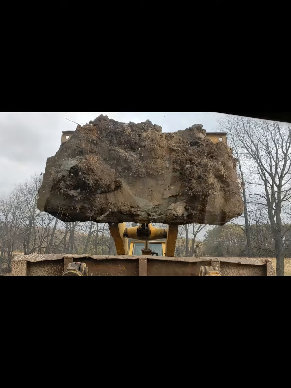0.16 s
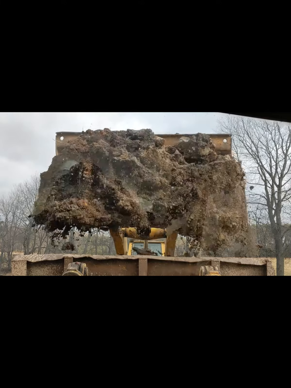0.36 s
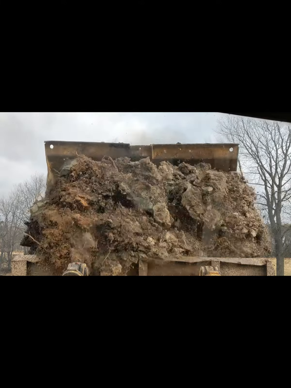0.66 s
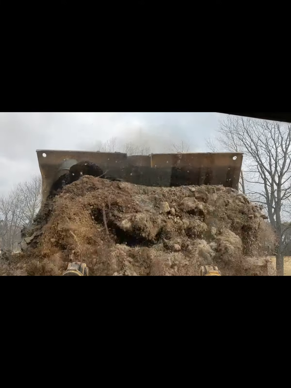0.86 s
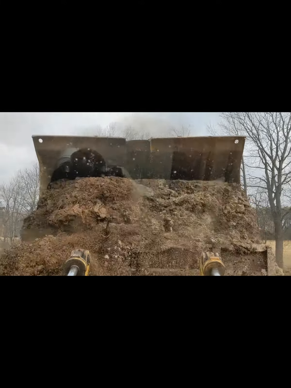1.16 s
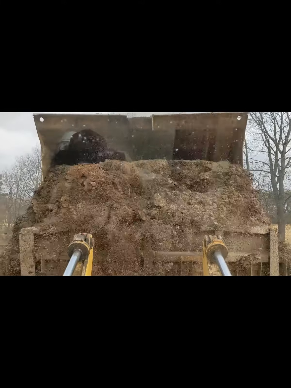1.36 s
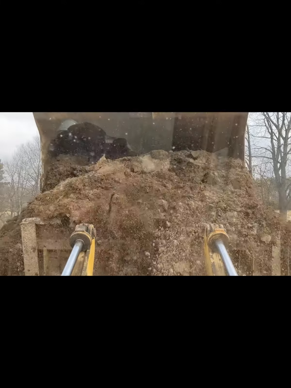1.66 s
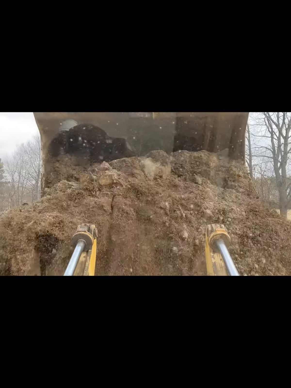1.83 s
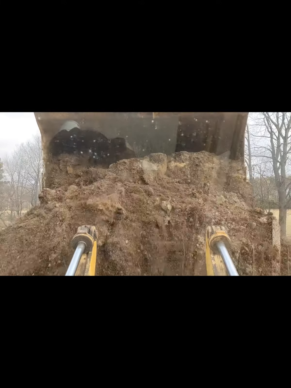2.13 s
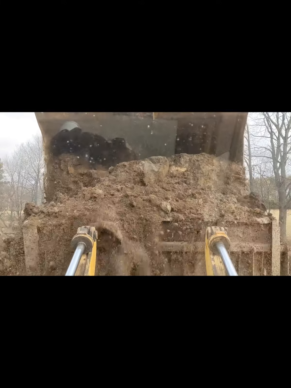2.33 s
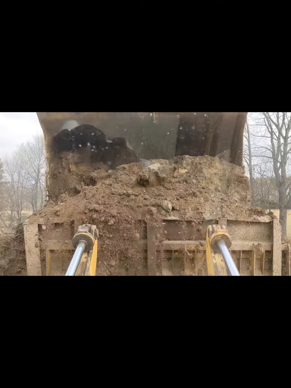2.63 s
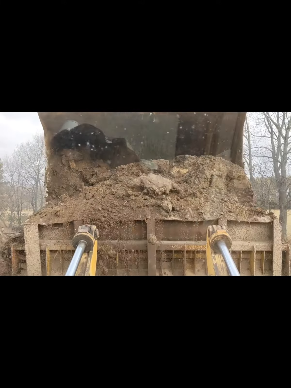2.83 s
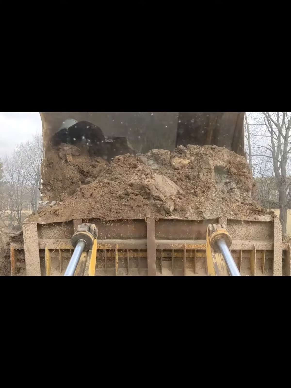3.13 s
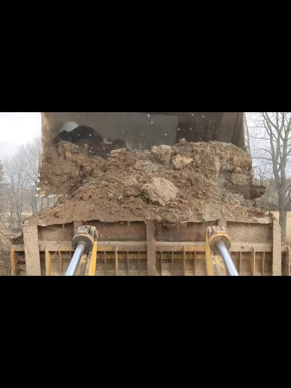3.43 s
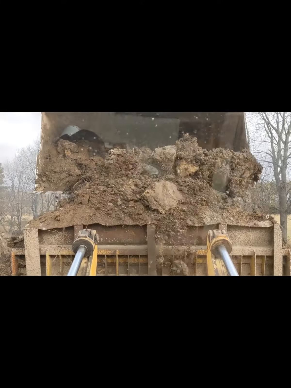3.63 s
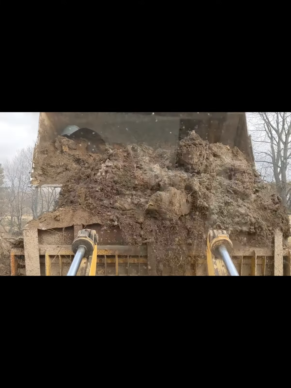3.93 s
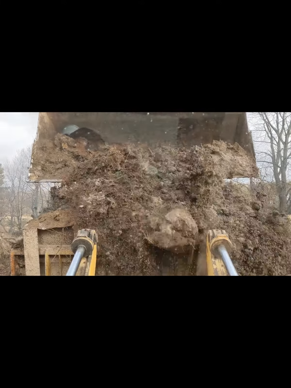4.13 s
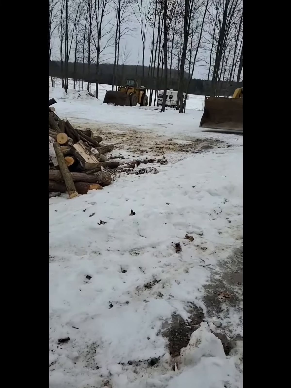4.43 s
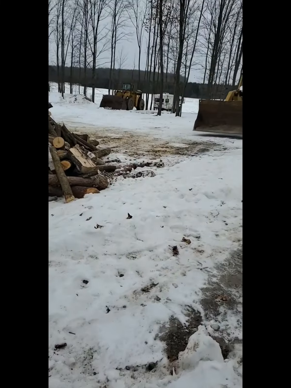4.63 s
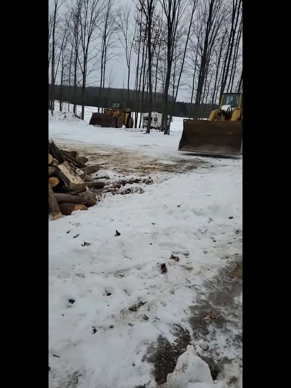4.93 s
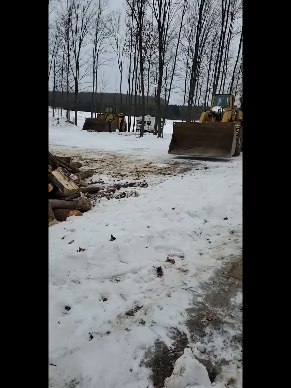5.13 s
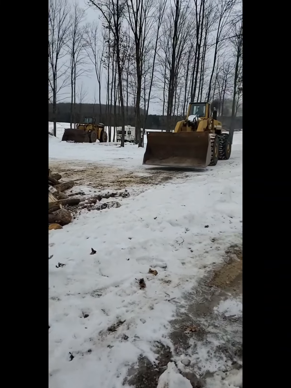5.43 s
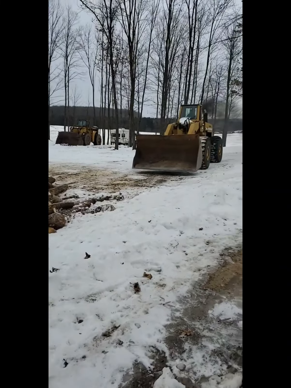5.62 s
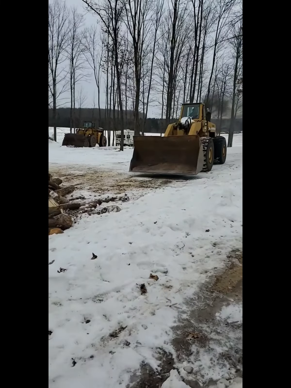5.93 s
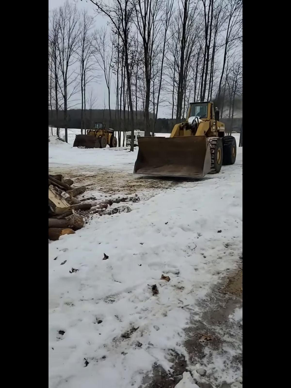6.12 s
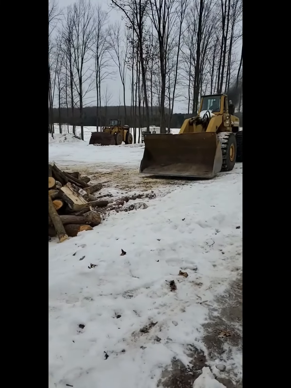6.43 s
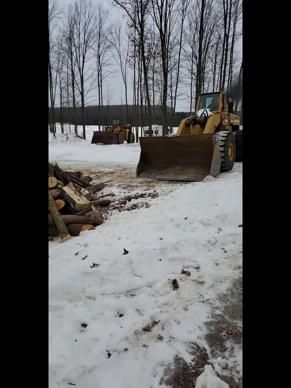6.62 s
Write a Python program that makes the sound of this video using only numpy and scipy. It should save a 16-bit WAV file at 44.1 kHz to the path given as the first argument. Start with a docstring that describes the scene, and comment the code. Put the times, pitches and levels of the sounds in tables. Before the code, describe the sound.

Close inside a loader cab, in stereo, a big diesel runs steadily with a boomy roar and buzzing panels. Soil and clods pour from a steel bucket into a truck, scraping and thudding; a low shudder swells, and a loose fitting clanks. It cuts dead. After a brief gap, a second loader, outdoors and mono, revs up with fan whine and throbbing hiss, then eases until its bucket clanks on frozen ground and booms.

```python
"""A diesel wheel loader heard from its cab: periodic firings excite the frame, cabin and panels, while
filtered noise grains make soil slide from the bucket into a truck; fittings rattle and one clanks.
The sound cuts off. After a short silence a second loader drives up over snow: its firing tone and fan
whine rise together, then ease a little, with a pulsing noise hiss, until its bucket strikes the ground
in a clank of damped partials."""
import sys
import numpy as np
from scipy.fft import rfft, irfft, next_fast_len
from scipy.io import wavfile
from scipy.ndimage import uniform_filter1d, minimum_filter1d, map_coordinates

SR = 44100
rng = np.random.default_rng(int(sys.argv[2]) if len(sys.argv) > 2 else 0)


def wrap_up_sound(samples):
    """Save the sound to the file named by the first command line argument, as 16-bit audio."""
    columns = np.atleast_2d(samples).T
    # keep every value between -1 and 1, then stretch to whole-number steps
    tamed = np.clip(columns, -1, 1)
    steps = np.round(tamed * 32767).astype(np.int16)
    wavfile.write(sys.argv[1], SR, steps)


N = 298557
TIME = np.arange(N) / SR  # seconds
CAB_END, YARD_START = 4.236, 4.494  # seconds
FLUTTER = 0.18  # phase flutter of the yard loader's tones, radians

# reference level of the engine's roar in the cab, which rattle, soil and lumps follow: start_s, level_db
ROAR_LEVEL = [(0, -18), (.85, -18), (.97, -20.5), (1.1, -17), (1.55, -18), (1.7, -22), (1.98, -16),
              (2.15, -19.5), (2.4, -17), (2.85, -20.5), (3.15, -24.5), (3.36, -22.5), (3.47, -20),
              (3.7, -19), (4.23, -20)]


def cab_engine():
    """Periodic forcing: the firings drive the frame, the air of the cabin and its panels."""
    cycles = turns(14.47 / 2 * (1 + 0.002 * wobble(6)))  # engine cycles, nearly constant speed
    return frame_hum(cycles) + cabin_resonances() + shudder() + cabin_boom() + roar_and_rattle(cycles)


def frame_hum(cycles):
    """Fourier's principle: the repeating engine cycle radiates tones at multiples of its rate."""
    # partials of the engine cycle: multiple, level_db
    orders = [(8, -19), (9, -36), (10, -27.5), (12, -26), (14, -33.5), (20, -35.5)]
    return sum(amp(db + 0.53 * wobble(6.28)) * tone(k * cycles, 0.13 * wobble(13)) for k, db in orders)


def cabin_resonances():
    """Resonance: the cabin answers at its own note, and a panel hums along as the last soil leaves."""
    drone_hz, drone_db, panel_hz = 110.2, -25.5, 337
    # swells of the cabin's own note: start_s (of the peak), level_db, length_s
    drone_swells = [(.3, -36, 0.15), (1.378, -17.5, 0.028), (1.646, -9, 0.055), (2.104, -18, .12),
                    (3.324, -23.5, 0.068), (4.154, -21.5, 0.065)]
    # hums of the panel: start_s (of the peak), level_db, length_s
    panel_hums = [(3.3, -35.5, 0.44), (3.502, -27, 0.085), (3.944, -24, 0.11)]
    strength = amp(drone_db + 3.8 * wobble(15)) + swells(drone_swells)
    drone = strength * tone(drone_hz * TIME, 0.5 * wobble(18))
    panel = swells(panel_hums) * tone(panel_hz * TIME, 0.33 * wobble(25))
    return drone + panel


def shudder():
    """Growth and decay: a low cabin tone builds exponentially as the bucket empties, then stops quickly."""
    peak_s, peak_db = 3.09, -7.5
    # pitch of the shudder: start_s, pitch_hz
    pitch = [(2.5, 46.3), (2.8, 50.5), (3.1, 52.9), (3.3, 50.2)]
    strength = amp(peak_db + ramp(peak_s, rise=17.5, fall=47.5))
    return strength * tone(turns(curves(pitch)[0]), 0)


def cabin_boom():
    """Coloured noise: low-frequency noise shaped by the cabin, with its own swells evened out."""
    # boom spectrum: pitch_hz, level_db (per Hz)
    spectrum = [(22, -33.5), (33, -22), (45, -13), (57, 1.5), (68, 4.5), (82, -11), (98, -5), (135, -16.5),
                (190, -29), (300, -69)]
    # boom level: start_s, level_db
    level = [(0, -20), (.65, -20), (1.2, -16.5), (1.6, -14), (1.9, -14.5), (2.4, -14), (2.8, -14.5),
             (3.25, -22), (3.7, -17.5), (4.2, -19.5)]
    return amp(curves(level)[0]) * steady(rush(1, spectrum), span=0.055)


def roar_and_rattle(cycles):
    """Amplitude modulation: firing pulses and uneven chatter gate part-periodic noise in two bands."""
    # roar spectrum: pitch_hz, level_db (per Hz)
    roar_spectrum = [(90, -18), (150, 4.5), (200, -3.5), (260, 1), (370, -3.5), (560, -9.5), (800, -8.5),
                     (1100, -16.5), (1700, -46), (3000, -67)]
    # rattle spectrum: pitch_hz, level_db (per Hz)
    rattle_spectrum = [(500, -23), (900, -4), (1200, -0.5), (1800, -1), (2300, -1), (2650, -9),
                       (2950, -13.5), (3600, -26.5), (6000, -66.5)]
    rattle_db, roar_trim_db = -7.5, -1.04  # relative to the roar's reference level
    # loose panels chatter at an uneven rate on top of the eight firing pulses a cycle
    chatter = bursts(turns(42 * amp(3.6 * wobble(35))), sharpness=0.2, scatter_db=1.0)
    shake = chatter * bursts(8 * cycles, sharpness=0.068, scatter_db=0.3)
    roar = in_cab(shake, roar_spectrum, combustion(cycles, share=0.45, size=6000))
    rough_shake = shake * amp(0.61 * wobble(500))
    rattle = in_cab(rough_shake, rattle_spectrum, combustion(cycles, share=0.27, size=6000))
    mixed = amp(roar_trim_db) * steady(roar, span=0.2) + amp(rattle_db) * steady(rattle, span=0.43)
    return amp(curves(ROAR_LEVEL)[0]) * mixed


def low_swells():
    """Beating-like swells: short low tones swell at 57 to 80 Hz, each at its own time and pitch."""
    # low tones: start_s (of the peak), pitch_hz, level_db, length_s
    low_tones = [(0.79, 80, -7.5, 0.023), (0.89, 75, -11.5, 0.03), (1.15, 70, -10, 0.047),
                 (1.305, 56.83, -7.5, 0.051), (1.413, 66.1, -8.5, 0.025), (1.746, 63.6, -12.5, 0.053),
                 (1.874, 59.9, -10.5, 0.072), (2.11, 64.9, -13, 0.076), (2.41, 57.9, -12, 0.082),
                 (2.695, 56.52, -13.5, 0.14), (3.38, 63.2, -8, 0.033), (4.1, 58.06, -13.5, 0.087)]
    return sum(amp(db) * swell(s, length) * tone(hz * TIME + rng.random(), 0)
               for s, hz, db, length in low_tones)


def soil():
    """Granular flow: fine grains merge into noise, while clods and lumps give separate impacts."""
    drumming = amp(curves(ROAR_LEVEL)[0] - 9) * lumps()  # 9 dB below the roar's reference level
    return pour() + scraping() + thudding() + drumming


def pour():
    """Granular noise: crumbs pour in dense uneven bursts, with small stones ticking and fine dust above."""
    # soil spectrum: pitch_hz, level_db (per Hz)
    soil_spectrum = [(2000, -32), (3100, 1.5), (4200, 0.5), (5200, -2.5), (6700, 0.5), (8300, -4),
                     (10500, -11.5), (16000, -34.5)]
    # dust spectrum: pitch_hz, level_db (per Hz)
    dust_spectrum = [(6000, -26.5), (9500, -4.5), (12000, -4.5), (15700, -6.5)]
    # dust level: start_s, level_db
    dust_level = [(.45, -70), (.65, -57.5), (1.05, -52.5), (1.25, -54.5), (1.7, -53.5), (2, -53.5),
                  (2.5, -48.5), (2.8, -62), (3.35, -67.5), (4.23, -54.5)]
    soil_db, dust_share = -23, 0.17  # relative to the roar; share of the dust's rise and fall it takes on
    stone_db = -23.5  # relative to the soil
    dust_db, = curves(dust_level)
    soil_gain = amp(curves(ROAR_LEVEL)[0] + soil_db + dust_share * (dust_db - dust_db.mean()))
    uneven = amp(0.33 * wobble(900) + 1.9 * wobble(6.9))
    grains = uneven * bursts(turns(55 * amp(4 * wobble(45))), sharpness=0.15, scatter_db=1.54)
    ticks = in_cab(stones(per_s=40, scatter_db=0), soil_spectrum)
    sliding = soil_gain * (in_cab(grains, soil_spectrum) + amp(stone_db) * ticks)
    return sliding + amp(dust_db) * in_cab(grains, dust_spectrum)


def scraping():
    """Friction as a train of small impacts: stones catch on the steel as clods scrape down the bucket."""
    # scrapes: start_s (of the peak), level_db, length_s
    scrapes = [(0.644, -27, 0.022), (0.748, -31.5, 0.042), (0.905, -28.5, 0.036), (2.196, -29, 0.019)]
    # scrape spectrum: pitch_hz, level_db (per Hz)
    spectrum = [(1400, -17), (2100, 12), (2600, 5.5), (3500, -0.5), (5000, -6.5), (8000, -13), (15000, -31)]
    return swells(scrapes) * in_cab(1, spectrum, grit())


def grit():
    """Impulsive noise: a fine crackle of stones on steel, as a pair of unrelated streams."""
    return np.array([stones(per_s=700, scatter_db=1.5) for _ in range(2)])


def stones(per_s, scatter_db):
    """Poisson impulses: random ticks whose sizes scatter by scatter_db, scaled to rms 1."""
    return unit((rng.random(N) < per_s / SR) * amp(scatter_db * rng.standard_normal(N)))


def thudding():
    """Impact excitation: clods land softly on the truck bed and its struck plate rings on at one pitch."""
    # landings: start_s, thud_db, thud_t60_s, plate_pitch_hz, plate_db
    landings = [(1.946, -19.5, 0.14, 1107, -24.5), (1.961, -30, .15, 480, -17),
                (2.275, -21, 0.068, 350, -21.5), (2.4, -32, 0.091, 484, -21.5), (2.555, -34, .1, 1049, -31),
                (2.85, -21.5, 0.12, 1097, -33), (3.898, -17.5, 0.061, 380, -30)]
    # thud spectrum: pitch_hz, level_db (per Hz)
    spectrum = [(120, -10), (170, -5), (300, -16.5), (480, 0.5), (700, -2.5), (950, -12.5), (1170, 10),
                (1400, -17), (2600, -25.5), (3500, -43.5)]
    plate_t60_s = 0.42
    thuds = sum(amp(db) * struck(s, t60) for s, db, t60, _, _ in landings)
    plates = sum(amp(db) * struck(s, plate_t60_s) * tone(hz * TIME, 0.32 * wobble(70))
                 for s, _, _, hz, db in landings)
    return thuds * in_cab(1, spectrum) + plates


def lumps():
    """Local modes: each small lump briefly rings a patch of steel at a pitch of its own; rms 1."""
    per_s, scatter_db = 280, 2.5
    centre_hz, spread_octaves, tilt_db_per_octave, t60_s = 562.5, 0.65, -2.5, 0.17
    count = int(per_s * CAB_END)
    start, phase_left, phase_right = rng.random((count, 3)).T[..., None]
    pitch, size = rng.standard_normal((count, 2)).T[..., None]
    octaves = spread_octaves * np.clip(pitch, -1.4, 2.4)
    age = np.arange(SR // 14) / SR
    fade = amp(-60 * age / t60_s) * np.clip(age / 0.0022, 0, 1)
    strength = amp(scatter_db * size + tilt_db_per_octave * octaves) * fade
    at = ((start * CAB_END * SR).astype(int) + np.arange(len(age))).ravel()
    cycles = centre_hz * 2 ** octaves * age + phase_left
    # the right channel differs only in phase
    lags = (0, 3 * (phase_right - 0.5))
    return unit(np.array([np.bincount(at, (strength * tone(cycles, lag)).ravel(), N) for lag in lags]))


def knocks():
    """Modal impact: each blow cracks and sets a loose steel fitting ringing in damped modes and buzzing."""
    # hard knocks: start_s, ring_db, crack_db, t60_s (of the buzz and crack)
    blows = [(0.599, -41, -19.5, 0.066), (3.226, -21.5, -44.5, 0.094), (3.232, -19, -44, 0.14),
             (3.254, -32.5, -54.5, 0.08)]
    # modes of the fitting: pitch_hz, level_db, t60_s
    steel_modes = [(1307, -3, 0.25), (1650, -6, .27), (1750, -9, 0.24), (1965, 2, .17), (2131, 0, 0.13),
                   (2390, -2, .15), (2450, -11, 0.11), (2940, -5, 0.12), (3203, 2, 0.08), (3330, -5.5, .08),
                   (3730, -14, .1), (4210, -10, 0.11), (5200, -12, 0.088)]
    # buzz spectrum: pitch_hz, level_db (per Hz)
    buzz_spectrum = [(700, -11), (1300, -5.5), (2000, 2), (2750, -9), (3150, -3.5), (3600, -15.5),
                     (5000, -18), (6000, -22), (15000, -51.5)]
    # crack spectrum: pitch_hz, level_db (per Hz)
    crack_spectrum = [(1500, -4.5), (3500, 0), (7000, -3), (11000, -11), (15500, -20.5)]
    steel_db, buzz_db = -3.5, 2.5  # clean ring and buzz, relative to ring_db
    ring, buzz, crack = np.zeros((2, N)), np.zeros(N), np.zeros(N)
    t = np.arange(SR // 2) / SR
    for s, ring_db, crack_db, t60 in blows:
        age = np.maximum(TIME - s, 0)
        fade = (1 - np.exp(-age / 0.0018)) * amp(-60 * age / t60)
        buzz += amp(ring_db + buzz_db) * fade
        crack += amp(crack_db) * fade
        modes = np.zeros((2, len(t)))
        for hz, db, life in steel_modes:
            phase = rng.random() + 0.3 * rng.random((2, 1))  # slightly apart in the two channels
            modes += amp(db - 60 * t / life) * np.sin(2 * np.pi * (hz * t + phase))
        onset = 1 - np.exp(-t / 0.00071)
        ring[:, round(s * SR):][:, :len(t)] += amp(ring_db + steel_db) * modes * onset
    buzzing = buzz * in_cab(amp(0.58 * wobble(430)), buzz_spectrum)
    cracking = crack * in_cab(amp(1.4 * wobble(720)), crack_spectrum)
    return ring + buzzing + cracking


def yard_loader():
    """Harmonic locking: firing tone, growl and fan of a six-cylinder diesel all follow one engine speed."""
    # engine speed: start_s, firings_per_s
    speed = [(4.5, 98.3), (4.87, 99.7), (5.2, 102.9), (5.45, 106.1), (5.75, 108.8), (6.15, 110.1),
             (6.77, 108.4)]
    # effort of the engine: start_s, rumble_db, exhaust_db
    effort = [(4.5, -32.5, -28), (4.62, -32, -24.5), (4.78, -24, -23.5), (5, -19.5, -24.5),
              (5.3, -22.5, -26.5), (5.55, -21.5, -26.5), (6, -17.5, -24.5), (6.33, -20.5, -25.5),
              (6.55, -20, -25)]
    # rumble spectrum: pitch_hz, level_db (per Hz)
    rumble_spectrum = [(22, -24), (36, -10), (52, 4.5), (65, -2.5), (82, 4), (120, -2.5), (160, -3),
                       (210, -8), (300, -17.5), (500, -68.5)]
    rumble_db, exhaust_db = curves(effort)
    firing = turns(curves(speed)[0] * (1 + 0.002 * wobble(20)))
    pulses = bursts(firing, sharpness=2.3, scatter_db=2.0)
    rumble = amp(rumble_db) * steady(rush(pulses, rumble_spectrum), span=0.12)
    whine = fan(2.32 * firing)  # belt-driven, 2.32 blades pass per firing
    broadband = treble_dips(exhaust(firing, exhaust_db) + loose_treble(firing))
    return firing_hum(firing) + rumble + whine + growl(firing) + broadband


def firing_hum(firing):
    """Periodic source: the firing tone and its half-rate companion swell together."""
    # swells: start_s (of the peak), level_db, length_s
    hum_swells = [(4.805, -18.5, 0.058), (5, -23, 0.034), (5.398, -24, 0.057), (6.26, -23.5, 0.27)]
    strength = amp(-28.5 + 1.8 * wobble(19)) + swells(hum_swells)
    half_rate = amp(-15.5) * tone(firing / 2, FLUTTER * wobble(20))
    return strength * (tone(firing, FLUTTER * wobble(12)) + half_rate)


def exhaust(firing, level_db):
    """Pulsed noise: each firing releases a decaying puff of part-periodic pressure ripple."""
    # exhaust spectrum: pitch_hz, level_db (per Hz)
    spectrum = [(45, -23), (150, -1.5), (340, -1), (450, 0.5), (680, 0), (800, -5.5), (1000, -5),
                (1250, -8.5), (1500, -8.5), (1900, -12.5), (2200, -19.5), (2800, -25.5), (4500, -59)]
    # mid-band noise swells briefly near the end: start_s (of the peak), level_db, length_s
    noise_swells = [(6.65, -24.5, 0.013), (6.686, -26, 0.023)]
    puffs = bursts(firing, sharpness=0.14, scatter_db=1.05)
    ripple = combustion(firing / 6, share=0.43, size=2400)[0]
    return (amp(level_db) + swells(noise_swells)) * rush(puffs, spectrum, ripple)


def loose_treble(firing):
    """Amplitude modulation: clatter, hiss and ringing thin metal throb with the unequal cylinders."""
    # clatter spectrum: pitch_hz, level_db (per Hz)
    clatter_spectrum = [(1800, -4), (2700, -2), (4000, -1), (4900, -4), (5600, -3.5), (6350, 2),
                        (7000, -5.5), (8100, -17), (10000, -34)]
    # hiss spectrum: pitch_hz, level_db (per Hz)
    hiss_spectrum = [(7000, -52), (8400, -25.5), (9800, -13), (11000, -5), (12000, -3), (13200, -5.5),
                     (14500, -13), (15700, -13.5)]
    # modes of the thin metal: pitch_hz, width_hz, level_db
    sheet_modes = [(1770, 190, 10), (3480, 80, 0), (3980, 100, 6), (5120, 150, 5), (6310, 140, -1),
                   (6520, 130, 6.5), (9400, 340, -0.5), (11140, 550, 3.5)]
    # loose parts chatter harder for a moment: start_s (of the peak), lift_db, length_s
    jolts = [(4.721, 5, 0.0073), (4.77, 2, .008), (6.153, 1.5, .008), (6.639, 4.5, .018)]
    pull_s = 4.7  # the loader pulls away with a burst of treble
    pull = swell(pull_s, 0.17)
    # the throb runs at half the firing rate and once per engine cycle
    half_rate = bursts(firing / 2, sharpness=0.46, scatter_db=0.9)
    throb = half_rate * bursts(firing / 6, sharpness=0.17, scatter_db=1.3)
    throb = throb * amp(sum(db * swell(s, length) for s, db, length in jolts))
    clatter = amp(-40.5 + 3.5 * pull) * rush(throb, clatter_spectrum)
    hiss = amp(-37 + 4 * pull + 0.33 * wobble(5.2)) * rush(throb, hiss_spectrum)

    def resonances(hz):
        return sum(amp(db) / (1 + ((hz - centre) / width * 1.4) ** 2) for centre, width, db in sheet_modes)

    sheet = unit(filtered(throb * rng.standard_normal(N), resonances))
    return clatter + hiss + amp(-32.5 + ramp(pull_s, rise=25, fall=31.5)) * sheet


def treble_dips(x):
    """Time-varying shelf: the treble sinks for a few hundredths of a second at a time."""
    # dips: start_s (of the lowest point), depth_db, length_s
    dips = [(4.883, -11, .009), (5.075, -10.5, 0.011), (5.248, -1.5, .008), (5.311, -5.5, .009),
            (5.865, -12.5, 0.013), (6.011, -9.5, 0.015), (6.617, -6, .008), (6.723, -16, 0.012),
            (6.76, -14.5, .018)]
    crossover_hz = 1880
    treble = filtered(x, lambda hz: 1 - 1 / (1 + (hz / crossover_hz) ** 10))
    return x + treble * (amp(sum(db * swell(s, length) for s, db, length in dips)) - 1)


def fan(blades):
    """Blade-passing tone: the fan sounds harmonics of its blade rate, some standing out now and then."""
    # whine: harmonic (of the blade rate), level_db
    harmonics = [(1, -30.5), (2, -40), (4, -47.5), (8, -53.5)]
    # swells as the loader moves: start_s (of the peak), harmonic, level_db, length_s
    fan_swells = [(5.144, 1, -25.5, 0.13), (5.246, 4, -40, 0.39), (6.15, 4, -44, 0.22),
                  (6.426, 2, -31, 0.13), (6.57, 1, -26.5, 0.047)]
    whine = np.zeros(N)
    for k, level_db in harmonics:
        strength = amp(level_db + 1.2 * wobble(6.1))
        strength = strength + swells([(s, db, length) for s, order, db, length in fan_swells if order == k])
        whine += strength * tone(k * blades, FLUTTER * wobble(28))
    return whine


def growl(firing):
    """Phase modulation: under load, partials of the engine cycle growl out, roughened by phase flutter."""
    # growls: start_s (of the peak), multiple (of the cycle rate), level_db, length_s
    partials = [(4.68, 42, -37, 0.19), (4.887, 37, -29.5, 0.096), (5.05, 28, -42, .25), (5, 104, -40, 0.32),
                (5.268, 68, -46, .1), (5.85, 78, -42, .3), (6.142, 35, -32, 0.062)]
    flutter = 0.75  # radians
    return sum(amp(db) * swell(s, length) * tone(k * firing / 6, flutter * wobble(55))
               for s, k, db, length in partials)


def bucket():
    """Damped partials: the steel bucket clanks on the frozen ground, then its shell booms as it ploughs on."""
    # blows: start_s, level_db
    hits = [(6.635, -25), (6.68, -29), (6.71, -25.5)]
    # partials of the closing clank: pitch_hz, level_db
    clank_partials = [(501, 3), (888, 2.5), (1470, -3), (2080, -8), (2170, -10.5), (2900, -16.5)]
    blow_t60_s = 0.14
    plough_s, plough_db, plough_t60_s, plough_hz = 6.685, -3.5, 1.5, 82
    snow_db = -8  # rumble of the pushed snow, relative to the boom
    blows = sum(amp(db) * struck(s, blow_t60_s) for s, db in hits)
    ring = sum(amp(db) * tone(hz * TIME, 0.9 * wobble(130)) for hz, db in clank_partials)
    boom = tone(plough_hz * TIME, FLUTTER * wobble(50))
    # pitch_hz, level_db (per Hz)
    snow = rush(1, [(25, -9), (50, 1), (125, 6.5), (200, -2), (400, -55.5)])
    return blows * ring + amp(plough_db) * struck(plough_s, plough_t60_s) * (boom + amp(snow_db) * snow)


def ticking():
    """Periodic gating: something in the cab ticks softly, fading as the load starts to slide."""
    # tick spectrum: pitch_hz, level_db (per Hz)
    spectrum = [(2800, -27), (4000, -2), (4800, 1), (5600, -9), (9000, -29.5)]
    beat = np.cos(np.pi * 9.75 * (TIME - 0.027)) ** 8  # 9.75 ticks a second
    return amp(np.interp(TIME, [0.55, 0.62], [-42, -70])) * beat * in_cab(1, spectrum)


def combustion(cycles, share, size):
    """Periodic plus turbulent pressure: a share of the power repeats every cycle as an even comb of partials."""
    pattern = unit(irfft(np.exp(2j * np.pi * rng.random((2, size // 2 + 1)))))
    repeating = pattern[:, (cycles % 1 * size).astype(int)]
    return np.sqrt(share) * repeating + np.sqrt(1 - share) * rng.standard_normal((2, N))


def bursts(cycles, sharpness, scatter_db):
    """Relaxation pulses: one decaying burst per cycle, each of a new size; rms 1."""
    sizes = amp(scatter_db * rng.standard_normal(4096))
    return unit(np.exp(-sharpness * (cycles % 1)) * sizes[cycles.astype(int) % 4096])


def in_cab(drive, spectrum, source=None):
    """Partial coherence: a driven source (noise by default), coloured by spectrum and panels, in stereo."""
    # ringing cab panels and glass: pitch_hz, width_hz, lift_db
    panels = [(253, 7.2, 1.5), (339.5, 15.7, 7.5), (380, 61, 8), (472.4, 19, 7.5), (651, 75, 12),
              (543, 22, 6.5), (892, 51, 8.5), (1058.5, 44, 8), (1197, 30, 8), (1532, 50, 7.5),
              (1892, 8.9, 10), (2618, 81, 9)]
    # left-right likeness: pitch_hz, likeness (0 to 1)
    alike = [(70, 0.93), (120, 0.0033), (240, 0.88), (480, 0.55), (950, 0.45), (1900, 0), (15000, 0)]

    def response(hz):
        lift = sum(db / (1 + (2 * (hz - centre) / width) ** 2) for centre, width, db in panels)
        turn = np.arccos(np.clip(along(alike, hz), 0, 1)) / 2
        return amp(along(spectrum, hz) + lift) * np.array([np.cos(turn), np.sin(turn)])

    source = rng.standard_normal((2, N)) if source is None else source
    mid, side = filtered(drive * source, response)
    return np.array([mid + side, mid - side]) / np.std(mid)


def rush(drive, spectrum, source=None):
    """Source and filter: a driven mono source (noise by default), coloured and scaled to rms 1."""
    source = rng.standard_normal(N) if source is None else source
    return unit(filtered(drive * source, lambda hz: amp(along(spectrum, hz))))


def tone(cycles, flutter):
    """Simple harmonic motion: a sine of rms 1 with a fluttering phase (radians)."""
    return np.sqrt(2) * np.sin(2 * np.pi * cycles + flutter)


def turns(hz):
    """Phase as the integral of frequency: cycles completed at a changing rate."""
    return np.cumsum(hz) / SR


def struck(s, t60):
    """Exponential damping: an envelope that rises over 9 ms from time s, without a click, and dies away."""
    age = np.maximum(TIME - s, 0)
    return amp(-60 * age / t60) * np.clip(age / 0.009, 0, 1)


def swell(s, length):
    """Gaussian envelope: a smooth rise and fall of height 1 around time s."""
    return np.exp(-((TIME - s) / length) ** 2)


def swells(rows):
    """Superposition: the summed gains of swells given as rows of (s, dB, length s)."""
    return sum(amp(db) * swell(s, length) for s, db, length in rows)


def ramp(s, rise, fall):
    """Exponential growth and decay: dB below a peak at time s, at steady rates (dB a second)."""
    return -rise * np.maximum(s - TIME, 0) - fall * np.maximum(TIME - s, 0)


def wobble(rate):
    """Band-limited randomness: a smooth random curve through rate knots a second."""
    fine = np.arange(0, rate * N / SR + 1, 1 / 8)
    smooth = map_coordinates(rng.standard_normal(8192), [fine], mode="wrap")
    return np.interp(TIME * rate, fine, smooth)


def steady(x, span):
    """Power normalisation: even out the swells of x that last longer than span seconds."""
    power = uniform_filter1d(np.mean(np.atleast_2d(x) ** 2, axis=0), max(int(span * SR), 2))
    return x / np.sqrt(np.abs(power) + 1e-12)


def filtered(x, response):
    """Linear filtering: the spectrum of x times a response of frequency."""
    m = next_fast_len(N + 8192)
    return irfft(rfft(x, m) * response(np.fft.rfftfreq(m, 1 / SR)), m)[..., :N]


def along(points, hz):
    """Logarithmic pitch scale: (Hz, value) points joined on a log axis."""
    f, v = np.transpose(points)
    return np.interp(np.log(hz + 1), np.log(f + 1), v)


def curves(rows):
    """Linear interpolation: one value per sample for each column after the time."""
    s, *cols = np.transpose(rows)
    return [np.interp(TIME, s, c) for c in cols]


def amp(db):
    """Logarithmic level scale: decibels to gain."""
    return 10 ** (np.asarray(db) / 20)


def unit(x):
    """Mean power: scale to rms 1."""
    return x / np.sqrt(np.mean(x ** 2) + 1e-20)


def scene():
    """Superposition of sources: the cab in stereo, a silence, then the yard in mono."""
    # channel balance of the cab: pitch_hz, left_minus_right_db
    balance = [(110, 0.5), (160, 1), (270, -1), (600, -0.5), (1100, 1), (2000, -6.5), (3500, 1),
               (7000, -4.5), (15000, 2.5)]
    halves = np.array([[0.5], [-0.5]])
    cab = cab_engine() + low_swells() + soil() + knocks() + ticking()
    cab = filtered(cab, lambda hz: amp(along(balance, hz) * halves))
    cab_on = np.clip((CAB_END - TIME) / 0.004, 0, 1)
    yard_on = np.clip((TIME - YARD_START) / 0.00073, 0, 1)
    yard_on = yard_on * amp(np.interp(TIME, [YARD_START, 4.53], [-7.5, 0]))
    return cab * cab_on + (yard_loader() + bucket()) * yard_on


def record(dry):
    """Gain reduction and band limiting: the loudest peaks duck everything, and the top is cut off."""
    ceiling, hold_s, top_hz = 0.96, 0.035, 15750
    hold = int(hold_s * SR)
    needed = ceiling / np.maximum(np.abs(dry).max(axis=0), ceiling)
    gain = uniform_filter1d(minimum_filter1d(needed, hold), hold)
    return filtered(dry * gain, lambda hz: hz < top_hz)


dry = scene()
out = record(dry)
wrap_up_sound(out)
```